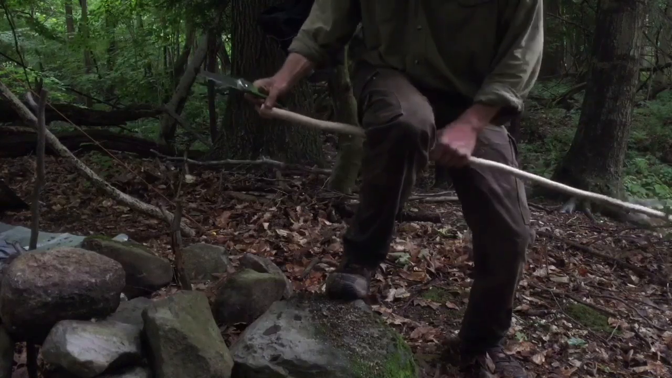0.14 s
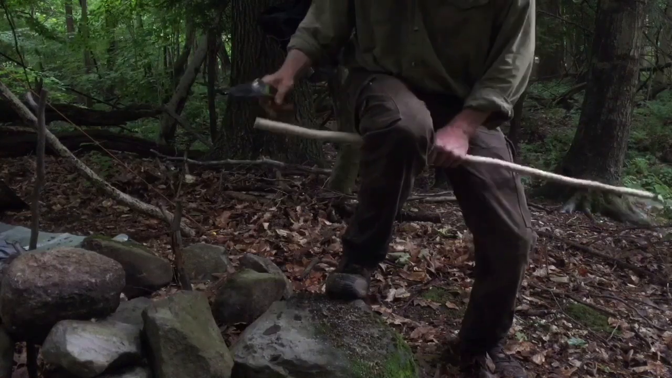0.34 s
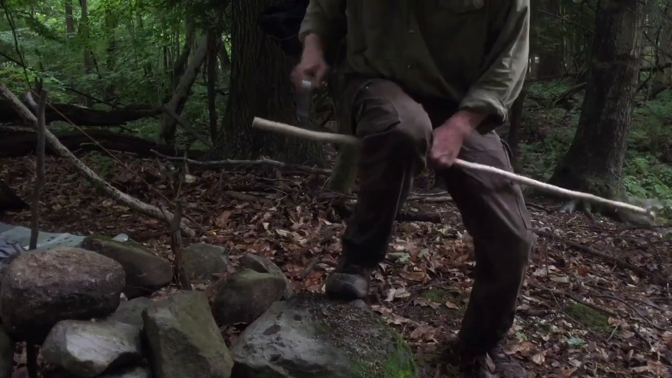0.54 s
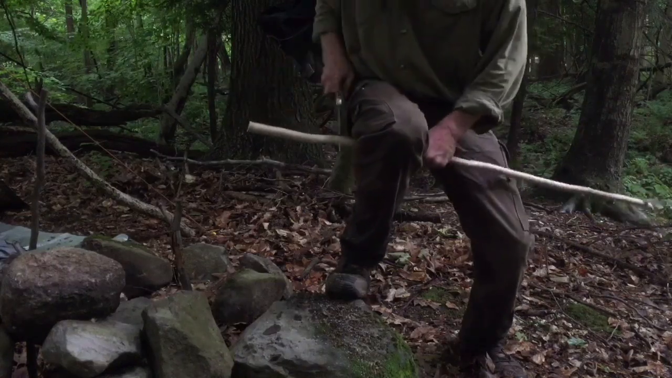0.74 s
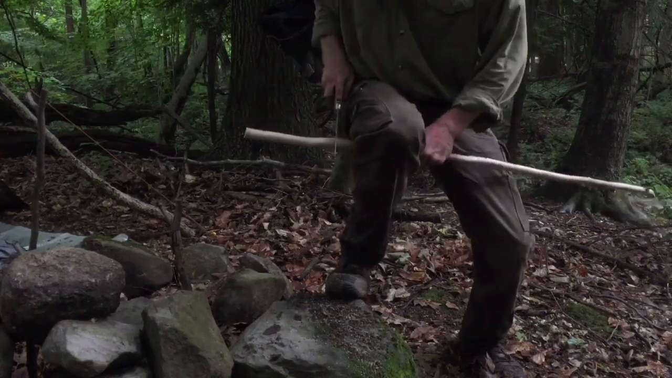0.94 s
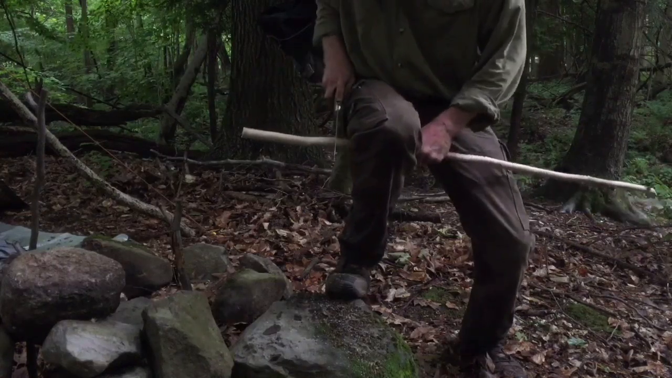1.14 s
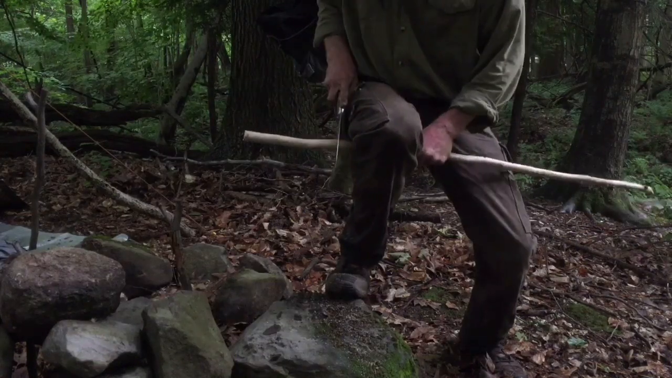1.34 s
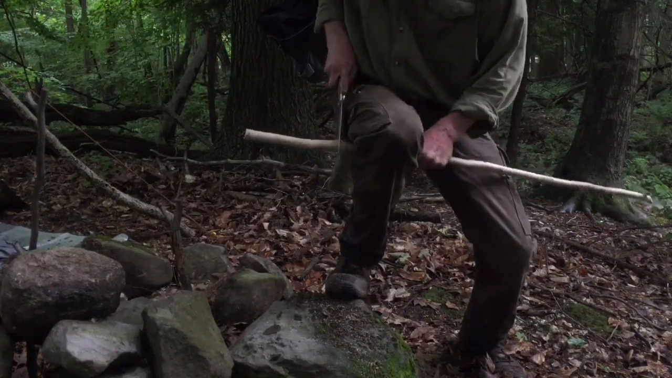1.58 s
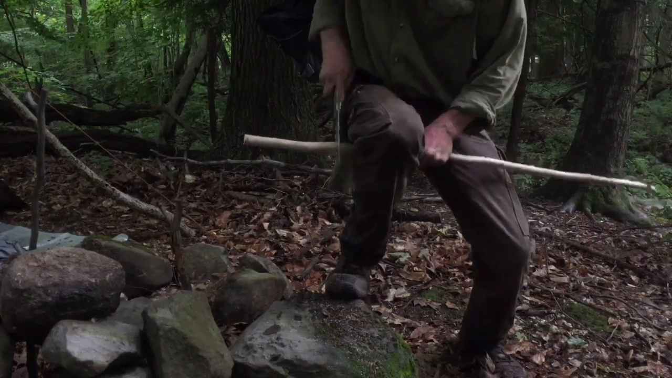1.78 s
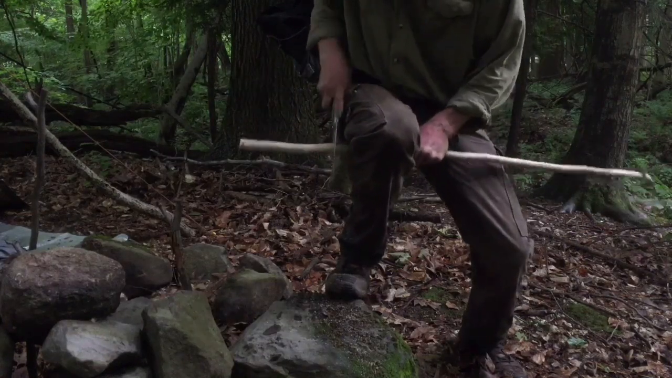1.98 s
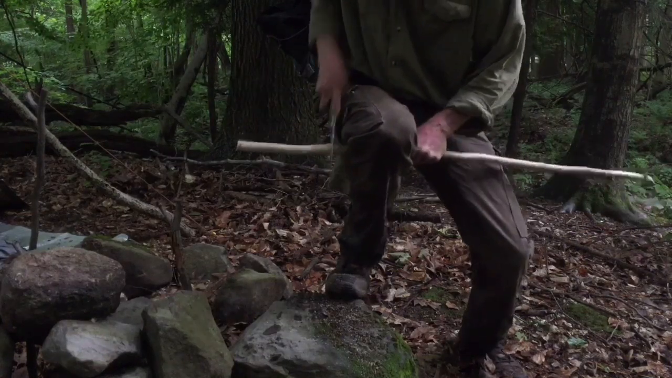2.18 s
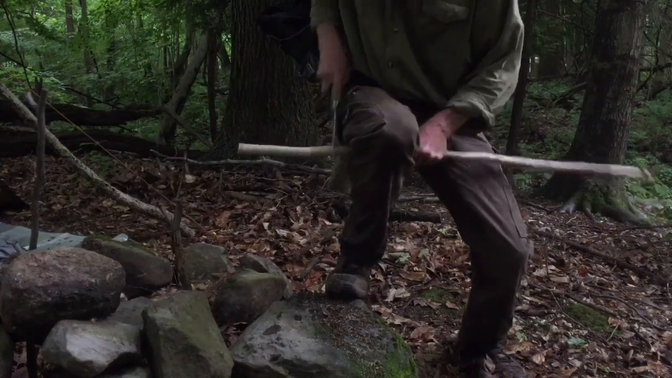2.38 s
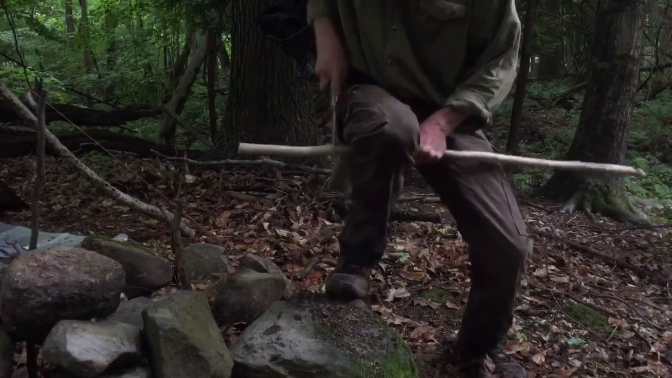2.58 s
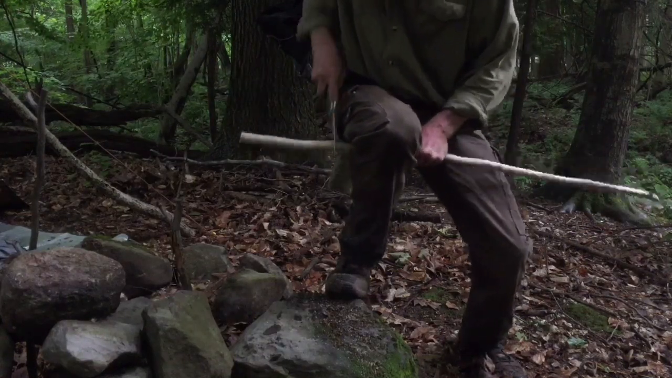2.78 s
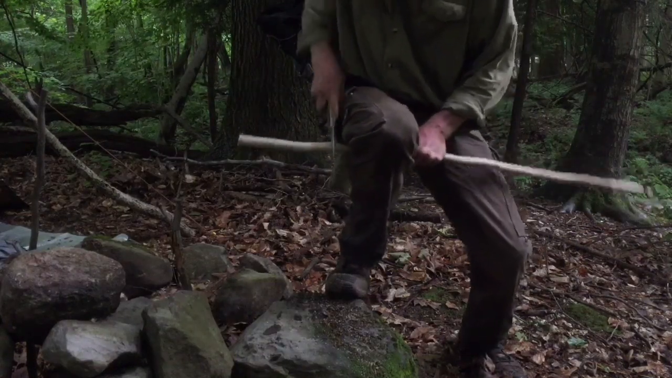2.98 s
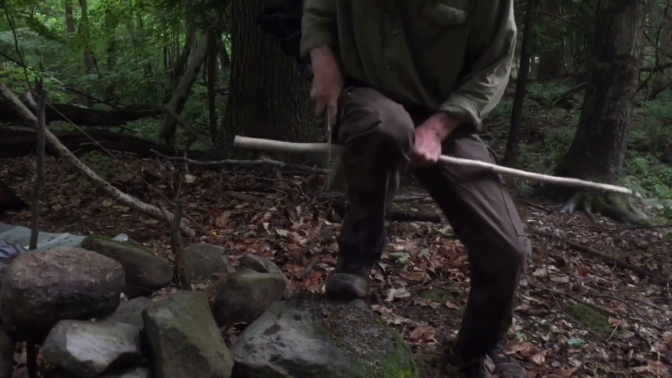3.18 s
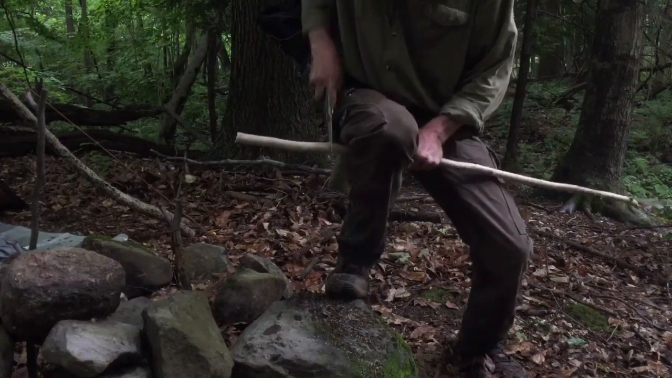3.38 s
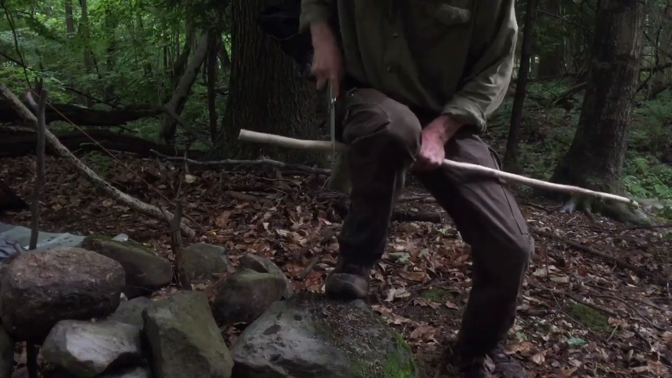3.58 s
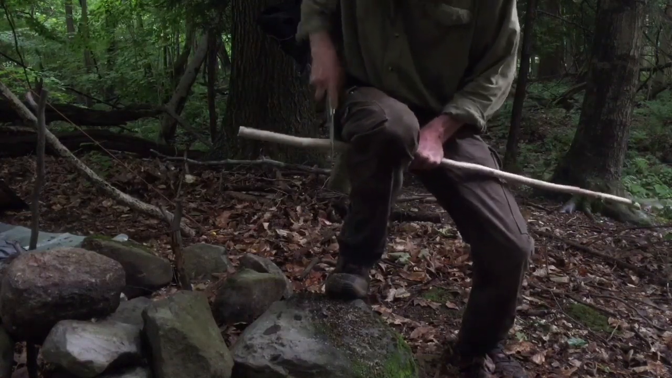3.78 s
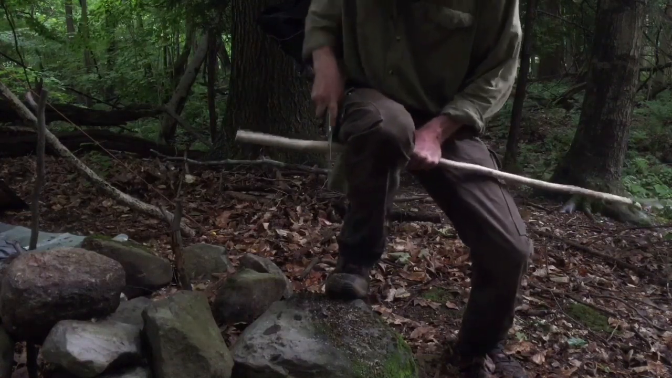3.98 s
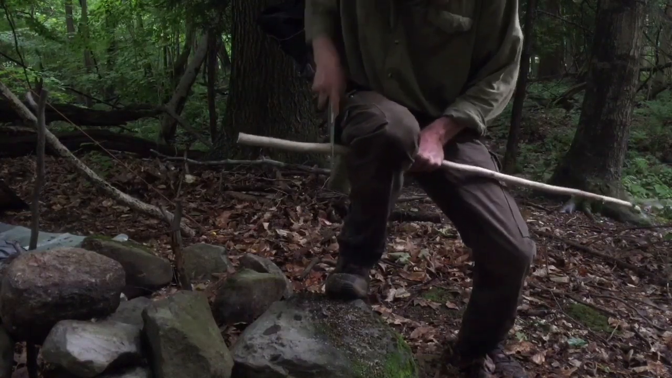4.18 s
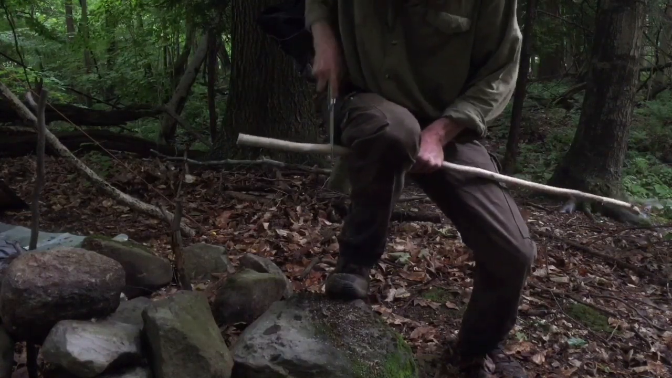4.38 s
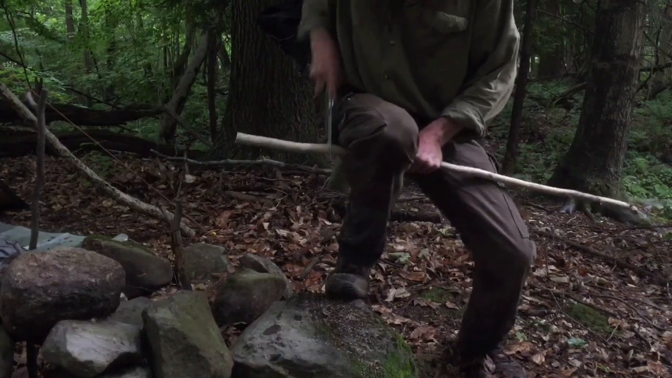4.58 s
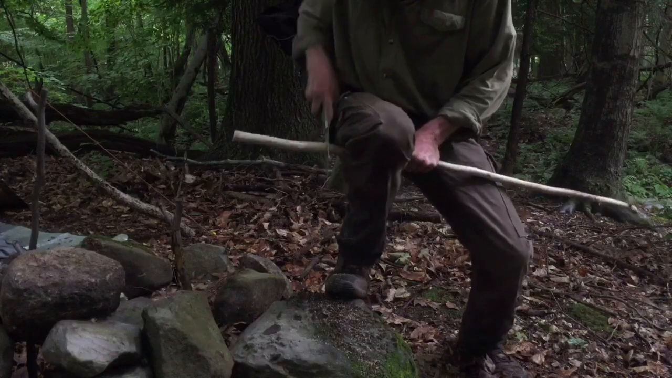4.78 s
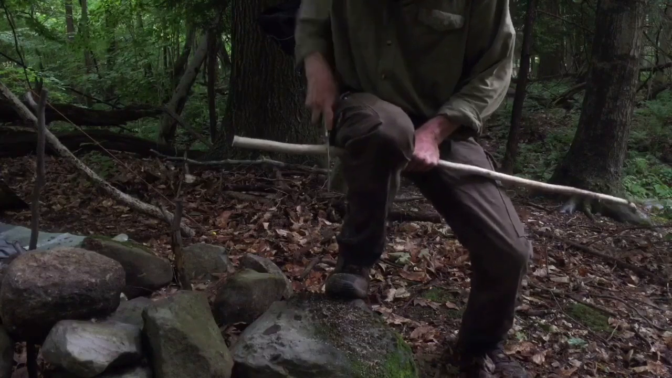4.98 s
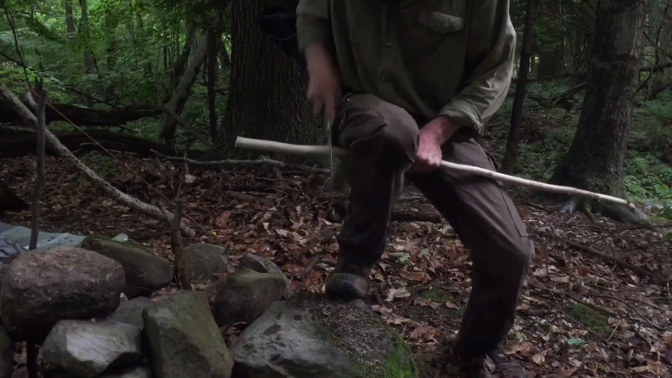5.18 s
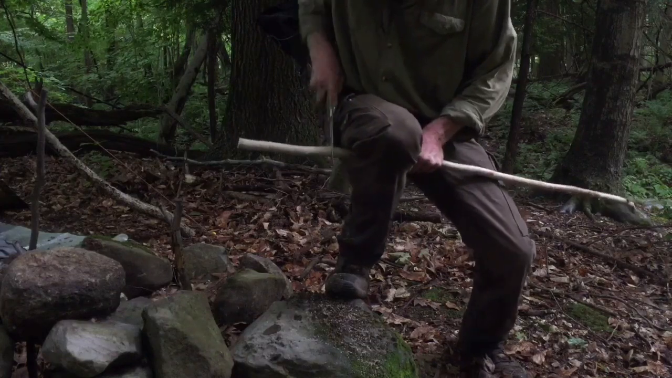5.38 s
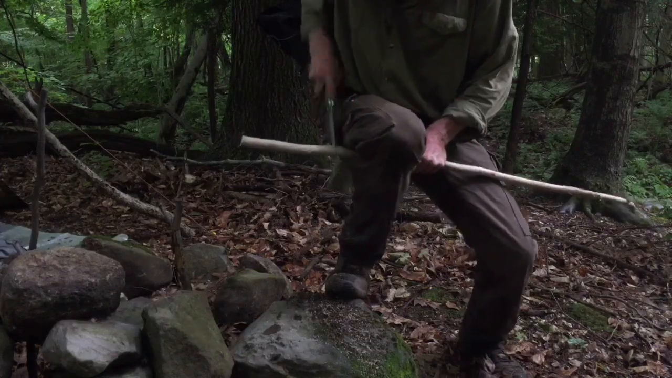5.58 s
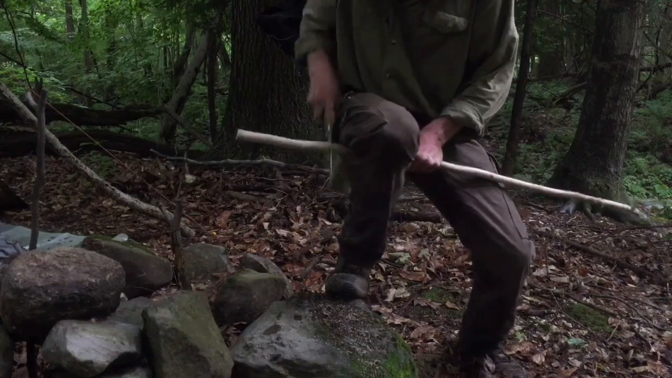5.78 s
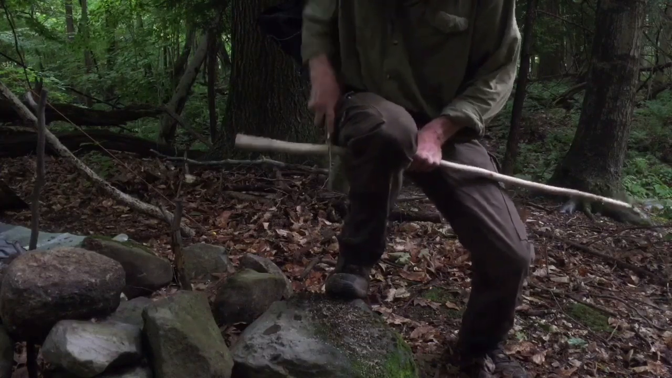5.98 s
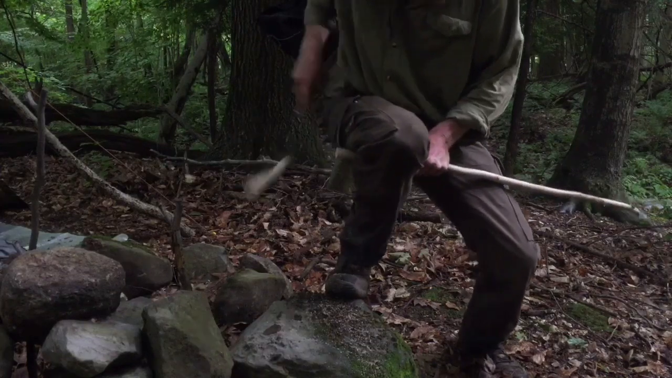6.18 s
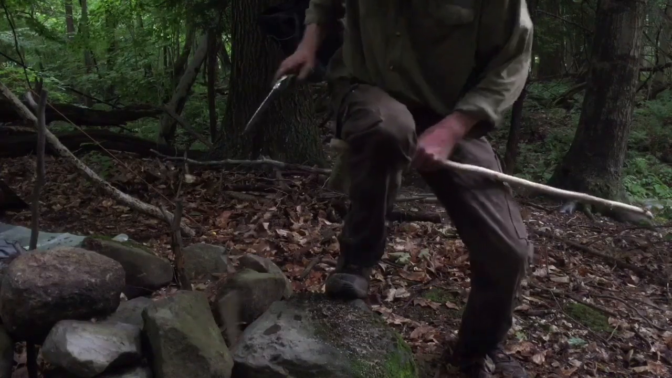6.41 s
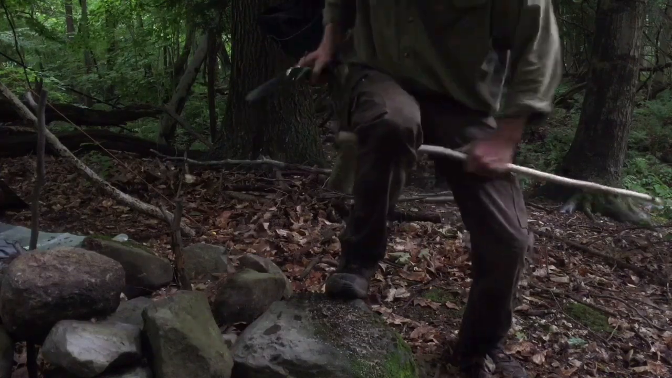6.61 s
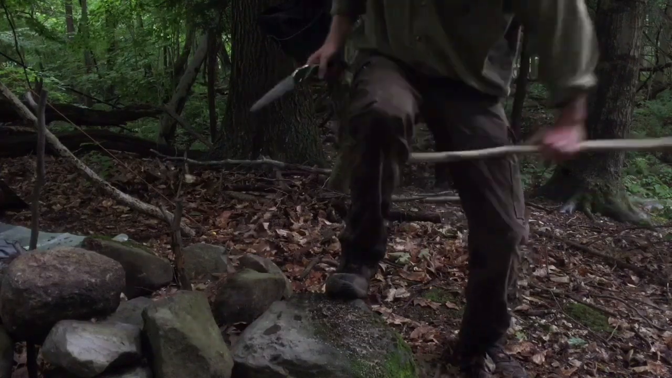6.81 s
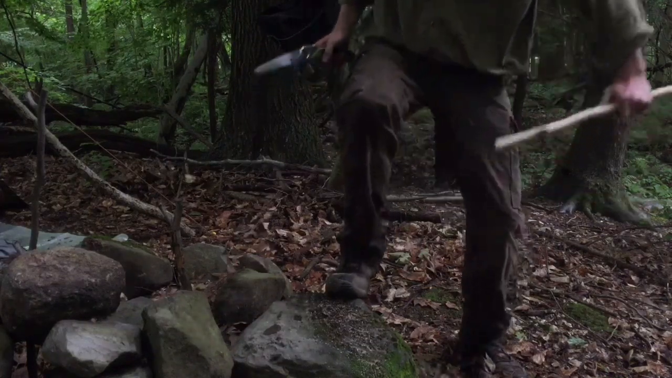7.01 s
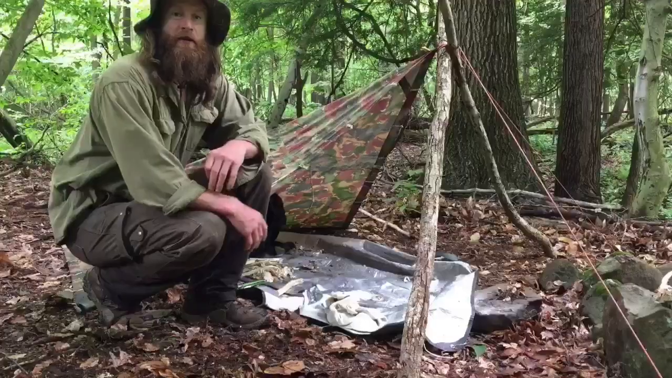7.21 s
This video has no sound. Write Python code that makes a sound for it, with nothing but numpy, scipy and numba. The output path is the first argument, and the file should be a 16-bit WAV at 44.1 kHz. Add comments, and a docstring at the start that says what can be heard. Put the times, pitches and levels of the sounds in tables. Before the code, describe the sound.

In a quiet forest, distant leaves hiss over faint wind and a far engine. After a few light touches, a nearby hand saw starts cutting a green stick with fast, even, rasping strokes that grow louder. The blade catches twice, the last fibres crack, and the cut end drops and bounces on stones with a few sharp, woody knocks.

```python
"""Far leaves hiss over wind and a distant engine, with a few light touches as a hand saw is set on a green
stick. Then it cuts, eight strokes a second: the teeth hum at their passing rate and tear fibres, whose impulses
excite the resonances of stick and blade. The last fibres snap, and the cut end drops and bounces on stones,
ringing in its damped modes. At the very end the whole sound dips briefly and partly returns."""
import sys
import numpy as np
from scipy import signal
from scipy.fft import rfft, irfft
from scipy.io import wavfile
from scipy.ndimage import uniform_filter1d
from numba import njit

SR = 44100
rng = np.random.default_rng(int(sys.argv[2]) if len(sys.argv) > 2 else 0)


def wav_record(signal):
    """Record a signal, one row per channel, as 16-bit PCM in the file named by sys.argv[1]."""
    frames = np.transpose(np.atleast_2d(signal))
    bounded = np.clip(frames, -1, 1)
    # unit amplitude maps onto the largest positive 16-bit level
    quanta = np.round(bounded * 32767).astype(np.int16)
    wavfile.write(sys.argv[1], SR, quanta)


N = 319725
T = np.arange(N) / SR

# Saw strokes: start_s, length_s, level_db, level_rise_db, tooth_hz, tooth_rise_hz, hum_db, hum_rise_db,
# hum_swell_db, body_db, hiss_db. Rises span the stroke; hum, body and hiss are relative to the level.
SAW_STROKES = [(1.662, 0.13, -47, -6, 524.0, -5.0, 0, 6.3, 9, -2.5, -5),
               (1.819, 0.091, -46.5, 10, 529.0, -96.5, -1, 15, -2, -6.5, -10.5),
               (1.936, 0.12, -39.5, 5.5, 559.0, 137.5, 0.5, -3, -10.8, -2.5, -5),
               (2.072, 0.11, -40, 4.5, 521.0, -84.5, -4, 10, 1, -9, -6.5),
               (2.188, 0.13, -37.5, -1.5, 527.0, -13.5, -2, 2, 5.1, -6.5, -7),
               (2.312, 0.12, -37, 9.5, 557.0, -123.0, -5, 2, -5, -12.5, -8.5),
               (2.433, 0.14, -35, -7.5, 580.0, -128.0, -6.5, -1, 4, -10.5, -6),
               (2.566, 0.104, -37, 4.5, 556.0, -77, -3.5, 7, -3, -9.5, -7.5),
               (2.678, 0.12, -35, 0, 588.0, 45.5, -4.5, 0, 9, -9, -5.5),
               (2.799, 0.11, -35.5, 2, 594.0, -5.5, -5, -9, 7, -12, -8),
               (2.913, 0.12, -37, -3, 505.0, -22, -9.5, -2, 27, -8, -6.5),
               (3.042, 0.11, -36.5, 3.5, 539.0, -37.5, -4.8, 4, -4, -11, -6.1),
               (3.156, 0.13, -35.5, 0.5, 523.0, 103.5, -5, -6, 2, -11, -7),
               (3.288, 0.11, -36.5, -7, 574.0, 140, -6.5, -4, 15.3, -9, -5.5),
               (3.4, 0.13, -37, 4.5, 534.0, 58, -7, -10, 7, -5, -8.5),
               (3.54, 0.12, -38.5, 10, 518.0, -88.5, -6.5, 13, 15, -5.5, -9.5),
               (3.674, 0.13, -37.5, 2, 575.0, 139.5, -2.5, 5, -1.5, -11.6, -7.5),
               (3.815, 0.11, -38, -6, 506.0, -106.0, -7, 3, 18, -9, -8.5),
               (3.933, 0.13, -38, 1, 596.0, 50.5, -7, 8, 3, -8, -8),
               (4.067, 0.11, -34.5, 13, 555.0, -36.5, -6.5, -3.0, 6, -6.5, -10),
               (4.189, 0.14, -35, 8, 551.0, 31, -7.5, -0.8, 8, -8, -8.5),
               (4.33, 0.12, -34.5, 2, 574.0, -144.0, -6.5, 13, 4, -11.9, -9.9),
               (4.452, 0.13, -34, 0, 594.0, 30.5, -2.5, -1, -1, -6, -6.5),
               (4.579, 0.113, -33, 5.5, 562.0, -14.5, -1.5, -5.7, -4, -7.5, -8.5),
               (4.696, 0.13, -32, -2, 583.0, 144, -2.6, 1, 6, -5, -6.6),
               (4.833, 0.11, -34.5, -4.5, 544.0, -1.5, -0.1, -8, -2, -5.5, -9),
               (4.956, 0.13, -32, -11.5, 583.0, 144.5, -4, -15, 7, -6, -8),
               (5.086, 0.11, -37, 13, 514.0, -0.5, -1.5, -7, -12, -6.5, -6.5),
               (5.209, 0.118, -32.5, -7.5, 535.0, 102.5, -1.4, -5, 0.0, -3.5, -6.5),
               (5.327, 0.11, -38.5, 12, 510.0, -44, -1, 0.1, -8, -10, -9.5),
               (5.442, 0.12, -33, -0.5, 558.0, -32, -2, 4, 4, -4, -8),
               (5.566, 0.1, -38.5, 15.5, 521.0, -73.5, -3.5, -4.2, -15, -5, -8.5),
               (5.68, 0.14, -32.5, -2, 542.0, -63, -5, 13, 7, -2.5, -7),
               (5.827, 0.11, -37, 6.2, 514.0, -16.5, -9, 11, -23, -7.5, -8.5),
               (5.96, 0.13, -33, -9, 514.0, 63.5, -5, -2, 14, -3, -6.5),
               (6.097, 0.12, -38, -6.5, 536.0, -29, -7.5, -13, 6, -11, -9)]
# The blade drags out of the opened cut: time_s, level_db, hum_db, tooth_hz, body_db, hiss_db
WITHDRAWAL = [(6.19, -30.5, 6.5, 521, -6, -11), (6.225, -53.5, -15, 489, -2.5, -7.5),
              (6.255, -40, 8, 476, 7.5, 0.5), (6.325, -40, -21.5, 417, -22, -7.5),
              (6.352, -70.5, -21, 414, -6.5, 1)]
def strokes():
    """Reciprocating motion: level and tooth rate follow blade speed. Gives the saw's control curves."""
    rows = np.array(SAW_STROKES)
    current = rows[np.clip(np.searchsorted(rows[:, 0], T) - 1, 0, None)].T
    start, length, db, rise_db, hz, rise_hz, hum_db, hum_rise_db, swell_db, body_db, hiss_db = current
    t = T - start
    along = np.clip(t / length, 0, 1) - .5
    speed = np.cos(np.pi * along) - 2 / np.pi  # half sine, less its mean
    bite = (1 - np.exp(-np.clip(t, 0, None) / 0.006)) ** 4.3
    lift = (1 - np.exp(-np.clip(length - t, 0, None) / 0.0076)) ** 3.07
    arch_db = (8 - .19 * rise_db) * speed  # flatter in strokes that build up
    rubbing = undb(-60) * (T > rows[0, 0])  # remains while the blade turns
    gain = bite * lift * undb(db + rise_db * along + arch_db) + rubbing
    hum_db = hum_db + hum_rise_db * along + swell_db * speed
    tooth_hz = hz * (1 + .03 * speed) + rise_hz * along
    cutting = (gain, hum_db, tooth_hz, body_db, hiss_db + 0.4 * speed)
    sliding = curves(WITHDRAWAL)
    sliding[0] = undb(sliding[0])
    return np.where(T < WITHDRAWAL[0][0], cutting, sliding)


# Resonances of stick and blade: centre_hz, width_hz, relative_db
STICK_MODES = [(1442, 192, -4), (1870, 218, 0.5), (2191, 220, 1.5), (3130, 674, -5.5), (3710, 660, -4.5),
               (4493, 480, -10)]
BLADE_MODES = [(5530, 1050, -0.5), (6780, 1040, -0.5), (8200, 1830, -8), (9650, 1330, -9.5),
               (11600, 1350, -7.5), (13220, 1600, -7), (15070, 2100, -8)]
# The stick's body note shifts as the cut deepens: time_s, pitch_hz
BODY_PITCH = [(1.7, 1120), (4.5, 1047), (5.6, 1203), (6.3, 1146)]
# The free end rings less as it is cut off from the stick: time_s, relative_db
FREE_END_LEVEL = [(1.7, -4.5), (3.3, -7), (4.3, -16), (6.3, -22.5)]
def saw():
    """Source and filter: fibres torn at the tooth-passing rate drive the stick's and blade's modes."""
    gain, hum_db, tooth_hz, body_db, hiss_db = strokes()
    phase = np.cumsum(tooth_hz * (1 + .09 * walk(120))) / SR
    bite = np.exp(-(phase % 1) / 0.0094)
    fibres = grit(0.64) * (1 + 0.96 * bite) + 0.053 * unit(bite - bite.mean())
    fibres = 0.77 * fibres * undb(0.34 * walk(120)) + shimmer(fibres, ring_s=0.0073)
    # Uneven teeth: a wavering tone, blurred by fibre noise around the same rate.
    tone = np.sin(2 * np.pi * phase) * undb(4.4 * walk(70))
    blur = unit(band(band(fibres, tooth_hz, 170), tooth_hz, 200))
    hum = undb(hum_db) * unit(tone + 1.6 * blur)
    body_hz = contour(BODY_PITCH)
    body = undb(body_db) * unit(band(band(fibres, body_hz, 670), body_hz, 335))
    free_end = undb(contour(FREE_END_LEVEL)) * unit(band(fibres, hz=1535, width=130))
    stick = resonate(fibres, STICK_MODES, drift=0.0201)
    blade = undb(hiss_db) * resonate(fibres, BLADE_MODES, drift=0.021)
    return gain * (stick + hum + body + free_end + blade)


def resonate(x, modes, drift):
    """Forced resonance: broad modes whose centres wander as the grip and the cut change."""
    return unit(sum((-1) ** k * undb(db) * band(x, hz * (1 + drift * walk(27)), width)
                    * undb(0.99 * walk(60)) for k, (hz, width, db) in enumerate(modes)))


def shimmer(x, ring_s, hop=1024):
    """High modal density: the thin blade's impulse response is a random tail that changes as it flexes."""
    blocks = np.array([x[i * hop:][:2 * hop] * np.hanning(2 * hop) for i in range(N // hop - 1)])
    tails = rng.standard_normal(blocks.shape) * np.exp(-T[:2 * hop] / ring_s)
    rung = irfft(rfft(blocks, 4 * hop) * rfft(tails, 4 * hop))
    out = np.zeros(N + 4 * hop)
    for i, block in enumerate(rung):
        out[i * hop:][:4 * hop] += block
    return unit(out[:N])


# The stick shakes against the knee: time_s, pitch_hz
SHAKE_PITCH = [(1.65, 229), (5, 248), (5.9, 174.9), (6.35, 175.7)]
# Its running shake and its single jolts: time_s, level_db
SHAKE_LEVEL = [(1.65, -65.5), (3.2, -63.5), (4.4, -61.5), (5.3, -61), (6.35, -56)]
JOLTS = [(2.346, -41), (2.408, -69), (2.591, -43), (2.95, -59), (3.066, -39), (4.212, -60), (4.593, -53),
         (4.852, -47), (5.222, -48), (5.451, -51), (5.926, -43), (5.984, -36), (6.186, -38), (6.258, -33)]
def shaking(rise_s=0.003, fall_s=0.027):
    """Forced vibration: strokes and jolts drive a dull, low resonance of the stick on the knee."""
    hz = contour(SHAKE_PITCH)
    gain = undb(curves(SHAKE_LEVEL)[0]) * (0.64 + .5 * unit(strokes()[0]))
    for start, db in JOLTS:
        t = np.clip(T - start, 0, None)
        gain += undb(db) * (1 - np.exp(-t / rise_s)) * np.exp(-t / fall_s)
    return gain * unit(band(band(grit(1.8), hz, 67), hz, 84))


# The last fibres break: start_s, level_db, centre_hz, thud_relative_db, rise_s
FIBRE_SNAPS = [(6.184, -23.5, 980, -9.5, 0.003), (6.201, -19, 1270, -43.5, 0.003),
               (6.247, -24.5, 3050, -21.5, 0.0025), (6.258, -22, 1900, -5.5, 0.0014),
               (6.282, -30.5, 1470, -29.5, 0.0019)]
def snaps():
    """Fracture: each break releases a burst of noise, with a thud of the sagging end."""
    out, t = np.zeros(N), T[:SR // 10]
    for start, db, hz, thud_db, rise_s in FIBRE_SNAPS:
        tear = burst(t, rise_s)
        crack = 3.1 * band(tear, hz, 1200) + 0.33 * band(tear, 3000, 4500)
        thud = 9.0 * undb(thud_db) * band(band(tear, 170, 170), 180, 300)
        out[int(start * SR):][:len(t)] += undb(db) * (crack + thud)
    return out


# The blade catches before a turn, or lightly touches the bark: start_s, level_db, centre_hz
BLADE_CATCHES = [(5.655, -20, 700), (5.924, -22, 603)]
BARK_TOUCHES = [(.226, -38, 1280), (.68, -52, 3000), (1.04, -53, 6500), (1.29, -54, 2500),
                (4.952, -46, 7960)]
def blade_contacts():
    """Transient excitation: a brief contact gives a quickly decaying band of noise."""
    out, t = np.zeros(N), T[:SR // 10]
    for start, db, hz in BLADE_CATCHES:
        catch = burst(t, rise_s=0.0032)
        out[int(start * SR):][:len(t)] += undb(db) * band(band(catch, hz, 700), hz, 900)
    for start, db, hz in BARK_TOUCHES:
        touch = rng.standard_normal(len(t)) * np.exp(-t / 0.011)
        out[int(start * SR):][:len(t)] += undb(db) * band(touch, hz, 0.91 * hz)
    return out


# Modes of the cut end: pitch_hz, t60_s, onset_share (of the contact time)
OFFCUT_MODES = [(489, 0.14, 0.76), (380, 0.092, 0.94), (1074, 0.0064, 0.2), (1527, 0.023, 0.92),
                (1563, 0.095, 0.93), (1644, 0.09, 0.99), (2120, 0.0077, 0.11), (3420, 0.01, 0),
                (5500, 0.016, .3), (6540, 0.015, 0.63), (220, 0.035, 0.67), (2520, 0.034, .5),
                (3750, 0.037, .5)]
# Landings: start_s, contact_s, crack_db, then level_db of each mode, set by where the piece lands
LANDINGS = [(6.538, 0.0021, -8.5, -40, -40, 1.5, -5, -14, -16.5, -19, -6.5, -23, -25.5, -22.5, -25, -30.5),
            (6.614, 0.0013, -24, -15.5, -43.5, -3, -10.5, -25, -21, -29.5, -28, -61, -51, -43, -29.5, -41),
            (6.7132, 0.00092, -15.5, -55, -48.5, -38.5, -19, -51, -7.5, 3.5, -9, -18, -26, -49, -21.5, -22.5),
            (6.922, 0.00104, -34, -20.5, -32.5, -25, -35, -27.5, -31, -25, -29, -55, -58.5, -42, -35, -34)]
def bounces(flight_s=.06, smother_t60_s=.05):
    """Impact and free decay: the cut end cracks on stone and rings in the air until leaves damp it."""
    out, t = np.zeros(N), T[:SR // 4]
    smother_db = 60 * np.clip(t - flight_s, 0, None) / smother_t60_s
    for start, contact_s, crack_db, *mode_db in LANDINGS:
        # A sharp crack, then a scatter of grit.
        crack = rng.standard_normal(len(t)) * (np.exp(-t / 0.0015) + 0.1 * np.exp(-t / .025))
        hit = undb(crack_db) * band(band(crack, 2700, 3900), 3000, 4500) * np.clip(t / 0.00037, 0, 1)
        for (hz, t60_s, onset_share), db in zip(OFFCUT_MODES, mode_db):
            free_s = np.clip(t - onset_share * contact_s, 0, None)
            envelope = undb(db - 60 * free_s / t60_s - smother_db) * np.clip(free_s / 0.00078, 0, 1)
            hit += envelope * np.sin(2 * np.pi * hz * free_s)
        out[int(start * SR):][:len(t)] += hit
    return out


# Dry leaves under the cut end, one list a rustle: time_s, level_db
LEAF_RUSTLES = [
    [(6.5, -81), (6.51, -66), (6.53, -49)],
    [(6.63, -57.5), (6.655, -49.5), (6.668, -43), (6.682, -51.5), (6.7, -55)],
    [(6.765, -51.5), (6.775, -51), (6.793, -55.5), (6.91, -54)],
]
# Sleeves and hands as the saw is set: time_s, level_db
SLEEVE_RUSTLE = [(.6, -77), (.68, -64), (.78, -70), (.9, -66), (1.0, -68), (1.1, -77)]
def rustles():
    """Crackling noise: many tiny, uneven impulses from leaves or cloth merge into a rustle."""
    gain = sum(undb(curves(rows)[0]) for rows in LEAF_RUSTLES + [SLEEVE_RUSTLE])
    return gain * unit(band(grit(2.2), 1900, 1900))


def trunk_echoes(x, t60_s=0.67, level_db=-31):
    """Scattering: reflections from trunks and ground form an exponentially decaying tail."""
    t = T[:SR]
    tail = band(rng.standard_normal(SR), 2000, 3900) * undb(-60 * t / t60_s) * np.clip(t / 0.014, 0, 1)
    return signal.fftconvolve(x, tail / np.sqrt(np.sum(tail ** 2)))[:N] * undb(level_db)


# Spectrum of the forest hiss: frequency_hz, relative_density_db
FOREST_SPECTRUM = [(71, -32), (120, -6.5), (160, -3), (251, -17), (284, -13), (483, -22.5), (535, -15),
                   (1320, -24.5), (1490, -29.5), (2590, -21.5), (2930, -26.5), (11300, -37.5),
                   (16000, -36.5)]
def far_leaves(level_db=-53.5):
    """Incoherent sum: countless leaves blend into noise whose half-octave bands flicker a little."""
    spectrum_hz, spectrum_db = np.transpose(FOREST_SPECTRUM)
    hiss, swell = 0, walk(0.55)
    for hz in 130 * 2 ** np.arange(0, 7.1, .5):
        db = np.interp(np.log(hz), np.log(spectrum_hz), spectrum_db) + 0.84 * swell + 0.46 * walk(8)
        hiss += undb(db) * band(rng.standard_normal(N), hz, hz / 3)
    return undb(level_db) * unit(hiss)


# Gusts of wind: time_s, level_db
GUSTS = [(0.0, -70), (0.04, -50), (0.55, -55), (0.59, -42), (0.69, -68), (0.75, -40.5), (0.99, -59),
         (1.16, -45), (1.2, -63), (1.46, -46.5), (2.16, -63), (2.23, -47), (2.29, -60), (2.81, -53),
         (4.6, -51), (6.17, -57), (6.21, -51), (6.33, -55.5), (7.1, -54.5)]
def wind():
    """Turbulence: low-frequency pressure fluctuations rumble in irregular gusts."""
    db = curves(GUSTS)[0] + 5.3 * walk(9)
    return undb(db) * unit(band(band(band(rng.standard_normal(N), 52, 36), 52, 50), 63, 60))


# Drone of the distant engine: time_s, level_db
ENGINE_LEVEL = [(0.0, -56), (0.85, -51), (0.93, -64), (1.14, -47), (1.26, -65), (1.46, -43), (1.52, -65),
                (1.76, -40), (1.8, -53), (2.1, -40), (2.18, -53), (2.85, -41), (2.89, -58), (3.12, -45.5),
                (3.42, -55), (3.46, -46.5), (4.83, -55.5), (6.66, -57.5), (6.74, -50), (6.88, -59.5),
                (7.1, -50.5)]
def engine(pitch_hz=76.3):
    """Quasi-periodic source: a low tone wavers in pitch and level amid narrow-band noise."""
    phase = np.cumsum(pitch_hz * (1 + 0.0212 * walk(5.5))) / SR
    tone = np.sin(2 * np.pi * phase) * undb(1.5 * walk(8.9))
    rumble = unit(band(band(rng.standard_normal(N), 85, 45), 85, 70))
    return undb(curves(ENGINE_LEVEL)[0]) * unit(tone + 0.43 * rumble)


def undb(db):
    """Decibels to amplitude ratio."""
    return 10 ** (np.asarray(db) / 20)


def unit(x):
    """Normalisation to an rms of 1."""
    return x / np.sqrt(np.mean(x ** 2))


@njit
def svf(x, hz, width):
    """State-variable band-pass with unity gain at its moving centre."""
    y, band_state, low_state = np.empty(len(x)), 0., 0.
    for i in range(len(x)):
        g, damping = np.tan(np.pi * hz[i] / SR), width / hz[i]
        v = (band_state + g * (x[i] - low_state)) / (1 + g * (g + damping))
        band_state, low_state = 2 * v - band_state, low_state + 2 * g * v
        y[i] = damping * v
    return y


def band(x, hz, width):
    """Second-order resonator with a fixed or moving centre; width in Hz."""
    if np.ndim(hz):
        return svf(x + 1e-18, hz, 1. * width)
    return signal.lfilter(*signal.iirpeak(hz, hz / width, SR), x + 1e-18)


def walk(rate_hz):
    """Random modulation: values held for 1 / rate_hz seconds and smoothed twice."""
    hold = int(SR / rate_hz)
    steps = np.repeat(rng.standard_normal(N // hold + 1), hold)
    return uniform_filter1d(uniform_filter1d(steps, hold), hold)[:N]


def grit(spread_db):
    """Heavy-tailed noise: dense clicks of uneven size."""
    return unit(rng.standard_normal(N) * undb(spread_db * rng.exponential(size=N)))


def burst(t, rise_s):
    """Noise under a critically damped envelope that peaks at rise_s."""
    return rng.standard_normal(len(t)) * t / rise_s * np.exp(1 - t / rise_s)


def contour(table):
    """Linear interpolation of (time_s, value) rows."""
    return np.interp(T, *np.transpose(table))


def curves(table):
    """Interpolation of each column over time; the first, in dB, forms arcs and falls silent outside."""
    times, db, *others = np.array(sorted(table)).T
    arc_db = 40 * np.log10(np.interp(T, times, undb(db / 2)))
    outside_s = np.clip(np.maximum(times[0] - T, T - times[-1]), 0, 1)
    return [arc_db - 1500 * outside_s] + [np.interp(T, times, column) for column in others]


def scene():
    """Superposition: the near sources and their echoes add to the forest background, in mono."""
    near = saw() + shaking() + snaps() + blade_contacts() + bounces() + rustles()
    return (near + trunk_echoes(near) + far_leaves() + wind() + engine())[None]


# Overall gain, steady until a deep dip and partial return at the very end: time_s, gain_db
OUTPUT_GAIN = [(7.059, -5.5), (7.12, -13), (7.16, -19.5), (7.19, -39.5), (7.22, -24.5), (7.25, -15.5)]
def record(dry):
    """Attenuation and band limiting: the gain curve, then a steep low-pass on the highest treble."""
    lowpass = signal.ellip(12, .2, 60, 15800, fs=SR, output="sos")
    return signal.sosfilt(lowpass, dry * undb(contour(OUTPUT_GAIN)))


dry = scene()
out = record(dry)
wav_record(out)
```